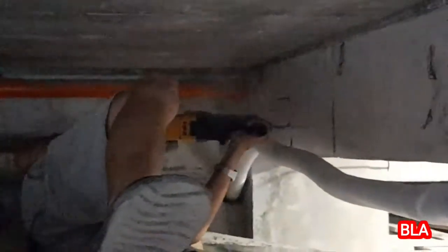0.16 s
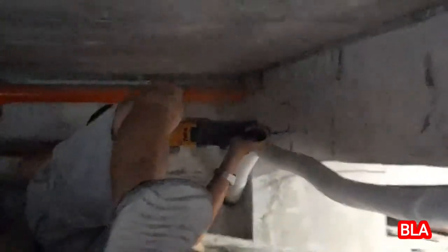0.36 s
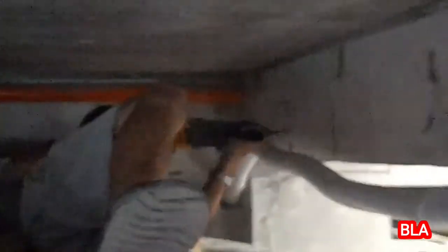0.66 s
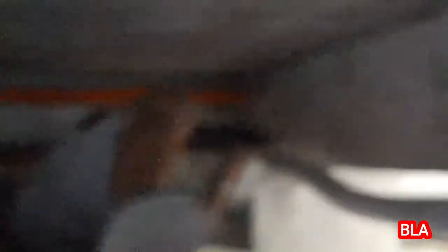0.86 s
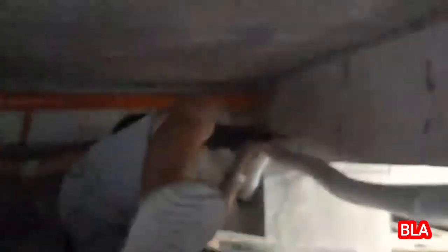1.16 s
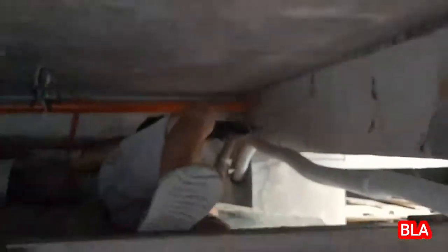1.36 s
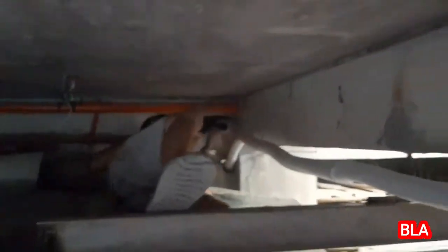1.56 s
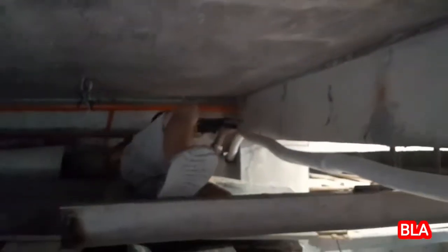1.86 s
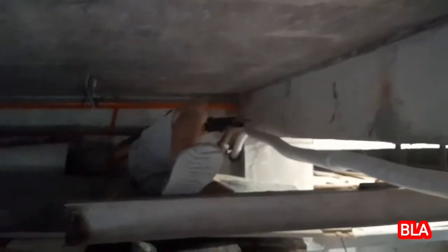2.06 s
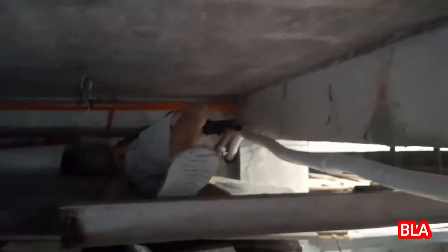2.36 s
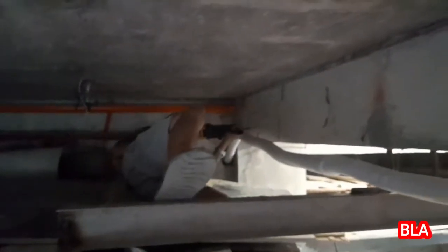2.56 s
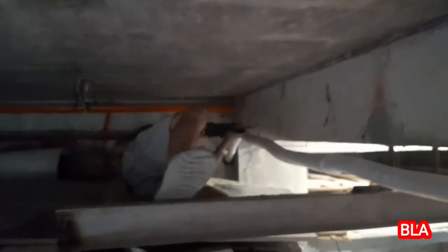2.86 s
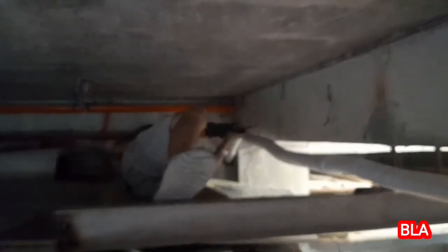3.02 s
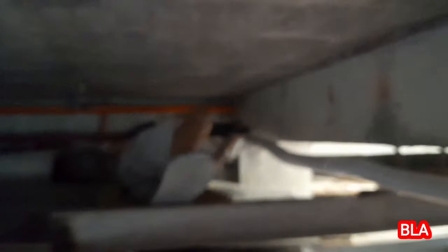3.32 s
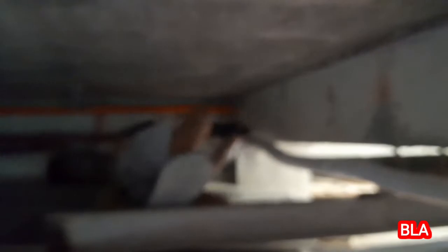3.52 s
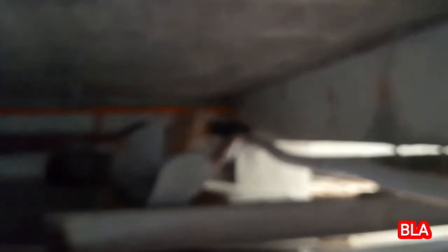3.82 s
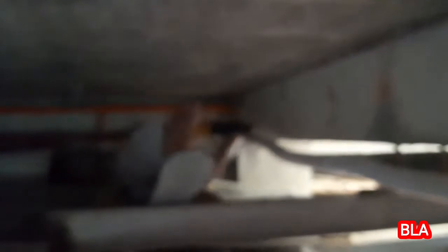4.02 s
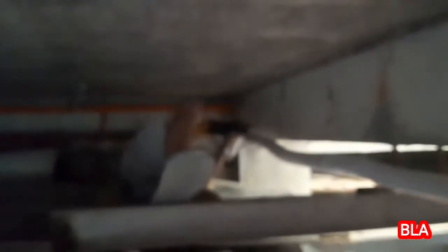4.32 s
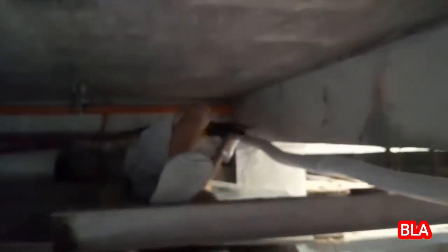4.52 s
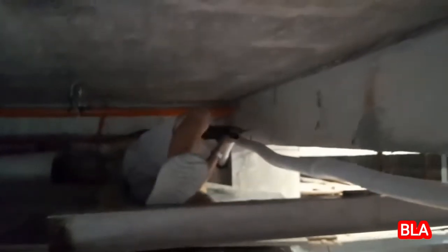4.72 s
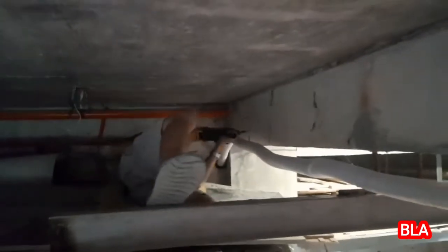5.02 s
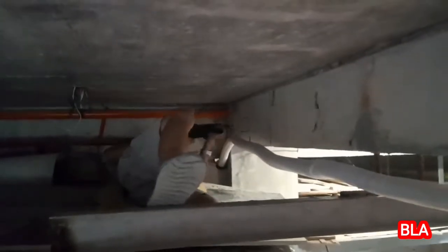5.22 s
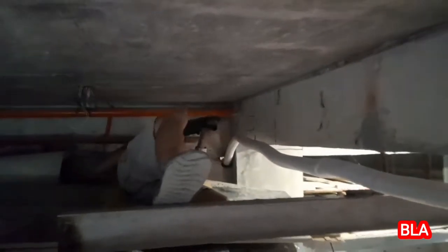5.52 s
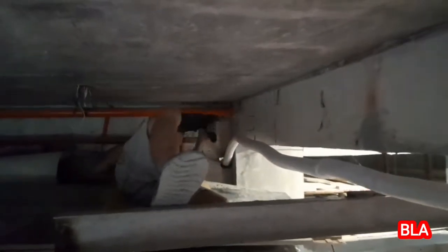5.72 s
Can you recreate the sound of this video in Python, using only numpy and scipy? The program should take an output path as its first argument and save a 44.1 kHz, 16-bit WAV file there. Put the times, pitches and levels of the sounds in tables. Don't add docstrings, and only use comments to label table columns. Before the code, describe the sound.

A phone near a worker in a cramped concrete void picks up three drill blips: a falling whine, a quieter rise and fall, and, after over two seconds of knocks, scuffs and far-off plant drone, a sharp loud rev that sinks in pitch. Gear whine, housing rattle and airy fan are close; thin insect hiss stays far behind, with dense short reverberation.

```python
import sys
import numpy as np
from scipy import signal
from scipy.fft import rfft, irfft
from scipy.io import wavfile
from scipy.ndimage import uniform_filter1d

SR = 44100
rng = np.random.default_rng(int(sys.argv[2]) if len(sys.argv) > 2 else 0)


def store_wav(level_fs):
    pcm = np.round(np.clip(np.atleast_2d(level_fs), -1, 1) * 32767)
    wavfile.write(sys.argv[1], SR, pcm.T.astype(np.int16))


def voltage_ratio(decibels):
    exponent = np.asarray(decibels, float) / 20
    return 10 ** exponent


N = 259291
t = np.arange(N) / SR

TEETH = 7
PATCHY_DB = 2.6
# (frequency [Hz], width [Hz], boost [dB])
SHELL_RINGS = [(342, 51, 6), (500, 86, 2), (628, 98, 9), (807, 76, 6), (960, 23, 2.5), (1200, 80, 3),
               (1663, 360, 6.5), (2060, 100, 5.5), (2516, 94, 0.5), (3950, 370, 1)]


def unit(x):
    return x / np.sqrt(np.mean(x ** 2))


def walk(rate):
    hold = int(SR / rate)
    steps = np.repeat(rng.standard_normal(N // hold + 1), hold)
    return unit(uniform_filter1d(uniform_filter1d(steps, hold), hold)[:N])


def shape(x, points, rings=()):
    hz = np.linspace(1, SR / 2, 2049)
    point_hz, point_db = np.array(points).T
    db = np.interp(np.log(hz), np.log(point_hz), point_db)
    for ring_hz, width_hz, boost_db in rings:
        db = db + boost_db / (1 + (2 * (hz - ring_hz) / width_hz) ** 2)
    cepstrum = irfft(np.log(voltage_ratio(db)))
    cepstrum = np.r_[cepstrum[0], 2 * cepstrum[1:2048], np.zeros(2048)]
    return signal.fftconvolve(x, irfft(np.exp(rfft(cepstrum))))[:len(x)]


def band(x, hz, width_hz, order=2):
    edges = [max(hz - width_hz / 2, 20), hz + width_hz / 2]
    return signal.sosfilt(signal.butter(order, edges, "band", fs=SR, output="sos"), x)


def ports(mid, side, side_db):
    high_pass = signal.butter(2, 1000, "high", fs=SR, output="sos")
    treble = signal.sosfilt(high_pass, side)
    side = voltage_ratio(side_db) * (0.76 * treble + 0.32 * side)
    return np.array([mid + side, mid - side])


def tones(table, flutter, patchy_db):
    out = np.zeros(N)
    waver = 1 + flutter * walk(30)
    patches = voltage_ratio(patchy_db * walk(24.95))
    for start, end, first_hz, last_hz, db in table:
        k = slice(int(start * SR), int(end * SR))
        swell = np.clip(np.minimum(t[k] - start, (end - t[k]) / 2) / 0.027, 0, 1)
        hz = np.interp(t[k], [start, end], [first_hz, last_hz]) * waver[k]
        out[k] += voltage_ratio(db) * patches[k] * swell * np.sin(2 * np.pi * np.cumsum(hz) / SR)
    return out


def gear_whine(phase, hz, tool_db, octaves):
    partials = [0, 4.5, 4, 3.5, 4.5, -2, 0, -8.5, 2]
    # (frequency [Hz], level [dB])
    gearbox = [(300, -16.5), (620, -2), (1000, 1), (1500, 2), (2500, 3), (2900, -3.5), (3400, -4),
               (4000, 2), (4600, -3), (6000, -15.5), (9000, -24)]
    whine = 0
    for k, db in enumerate(partials, 1):
        whine = whine + voltage_ratio(db + PATCHY_DB * walk(40)) * np.sin(2 * np.pi * k * phase)
    driven = uniform_filter1d(1. * (np.gradient(hz) > 0), SR // 20)
    whine_db = tool_db - 2 - 2.5 * abs(octaves + 0.28) - 3.9 * driven
    return shape(voltage_ratio(whine_db) * whine, gearbox, SHELL_RINGS)


def shaft_tones(phase, tool_db, octaves):
    # (multiple of the turn, level minus tool level [dB])
    orders = [(1.54, -23.5), (2, -26), (3, -25.5), (4, -26.5)]
    slow_db = 5.0 * np.minimum(octaves, 0)
    out = 0
    for multiple, db in orders:
        level = voltage_ratio(tool_db + 7.5 + slow_db + db + PATCHY_DB * walk(30))
        out = out + level * np.sin(2 * np.pi * multiple * phase / TEETH)
    return out


def rattle_and_fan(phase, hz, tool_db, octaves):
    # (frequency [Hz], level per Hz [dB])
    housing = [(59, -53), (100, -21.5), (220, -16.5), (275, -10.5), (394, -8.5), (604, -3), (1060, -2.5),
               (1630, -3), (2680, -5.5), (6000, -19), (7800, -25), (13200, -120)]
    # (frequency [Hz], level per Hz [dB])
    air_colour = [(2060, -23), (3500, -9.5), (3850, -7), (5060, -12), (7320, -12), (9030, -10.5),
                  (10200, -7), (14500, -15.5), (15500, -17.5), (16000, -35.5)]
    fan_db = -2.5 + octaves + 0.51 * np.minimum(tool_db + 39.5, 0)
    teeth = np.diff(np.floor(phase), prepend=0) * np.sqrt(SR / hz)
    turn = (1 + 0.22 * np.cos(2 * np.pi * phase / TEETH)) * voltage_ratio(walk(18))
    faces = []
    for strikes, brushes, air in rng.standard_normal((2, 3, N)):
        knocks = teeth * strikes
        rattle = unit(shape((0.62 * knocks + 0.78 * brushes) * turn, housing, SHELL_RINGS))
        fan = unit(shape((0.21 * knocks + air) * turn, air_colour))
        faces.append(voltage_ratio(tool_db - 1.5) * (rattle + voltage_ratio(fan_db) * fan))
    return ports(*faces, side_db=-1.0)


def body_hum(phase, hz, tool_db):
    # (shaft rate [Hz], hum minus tool level [dB])
    boom = [(40, -39.5), (115, -44.5), (145, -30.5), (174, -22.5), (225, -39.5), (278, -18), (315, -19),
            (350, -12)]
    shaft_hz, boom_db = np.array(boom).T
    hum_db = tool_db + np.interp(np.log(hz / TEETH), np.log(shaft_hz), boom_db)
    return voltage_ratio(hum_db + 4.0 + 3.7 * walk(35)) * np.sin(2 * np.pi * phase / TEETH)


def drill():
    # (time [s], tooth rate [Hz], tool level [dB])
    blips = [
        [(0.0, 2512, -21), (0.13, 2198, -24.5), (0.25, 1842, -26), (0.342, 1599, -27.5), (0.5, 1243, -29.5),
         (0.72, 804.3, -32.5), (0.906, 457.3, -37.5), (1.054, 224.4, -45.5), (1.17, 158, -62)],
        [(1.186, 249.2, -54.5), (1.26, 691.3, -34.5), (1.39, 1244, -27.5), (1.5, 1214, -28),
         (1.814, 754.4, -28.5), (2.034, 500, -31.5), (2.304, 221.5, -39.5), (2.41, 144.8, -45.5),
         (2.62, 57.94, -83)],
        [(4.99, 206.1, -65.5), (5.024, 721.5, -51.5), (5.05, 1076, -25), (5.1, 1648, -19), (5.15, 2039, -17.5),
         (5.24, 2035, -20.5), (5.4, 1616, -23), (5.65, 1194, -27.5), (5.88, 828.6, -31)],
    ]
    # (start [s], end [s], first [Hz], last [Hz], level [dB])
    buzz = [
        (1.2, 1.37, 358.7, 359, -48),
        (5.015, 5.085, 368, 364, -37),
    ]
    s, *columns = np.vstack(blips).T
    hz, tool_db = (uniform_filter1d(np.interp(t, s, c), SR // 50) for c in columns)
    octaves = np.log2(hz / 1200)
    on = (t < blips[1][-1][0]) | (t > blips[2][0][0])
    phase = np.cumsum(hz * (1 + .004 * walk(60)) + 3.5 * walk(70)) / SR

    whine = gear_whine(phase, hz, tool_db, octaves) + shaft_tones(phase, tool_db, octaves)
    pan_db = np.array([[.5], [-.5]])
    tool = rattle_and_fan(phase, hz, tool_db, octaves) + voltage_ratio(-8.5 + pan_db) * whine
    low = body_hum(phase, hz, tool_db) * on + tones(buzz, flutter=0.014, patchy_db=-7.0)
    return tool * on, low


def space(x):
    t60_s, echo_db = 0.29, -0.5
    s = t[:SR // 2]
    decay = np.exp(-np.log(1000) * s / t60_s)
    echoes = ports(*rng.standard_normal((2, len(s))) * decay, 0)
    echoes = voltage_ratio(echo_db) * echoes / np.sqrt(np.sum(echoes ** 2) / 2)
    echoes[[0, 1], [4, 0]] += 1
    wet = signal.fftconvolve(x * np.ones((2, 1)), echoes, axes=1)[:, :N]
    return wet / np.sqrt(1 + voltage_ratio(2 * echo_db))


def far_plant():
    # (time [s], level [dB])
    rumble_level = [(0.0, -9), (0.9, -6), (1.06, -3), (1.23, -7), (1.55, 5), (1.93, 1.5), (2.08, 6), (2.5, 5.5),
                    (2.75, 2.5), (3.08, -3.5), (3.3, 2), (3.55, 5.5), (3.86, 1), (3.97, 3), (4.26, 4), (4.5, 2),
                    (5.1, 1.5), (5.88, -0.5)]
    # (frequency [Hz], width [Hz], level [dB], rise per dB of common level [dB])
    low_notes = [
        (52, 5.1, -60.5, 0.7),
        (91.9, 9.3, -65, 1.63),
    ]
    # (frequency [Hz], level per Hz [dB])
    rumble_colour = [(18, -18), (30, -9.5), (108, 0), (300, -15.5), (404, -23.5), (839, -25), (1240, -38),
                     (1700, -41.5), (4970, -49.5), (5830, -54.5), (7000, -44), (9100, -68.5), (15400, -120)]
    rumble_level_db = np.interp(t, *np.transpose(rumble_level))
    layers = []
    for _ in range(2):
        layer = unit(shape(rng.standard_normal(N), rumble_colour)) * voltage_ratio(rumble_level_db - 59.5)
        for hz, width_hz, db, share in low_notes:
            layer += voltage_ratio(db + share * rumble_level_db) * unit(band(rng.standard_normal(N), hz, width_hz))
        layers.append(layer)
    mid, side = layers
    return mid * voltage_ratio([[-.7], [.7]]) + voltage_ratio(-16) * side * np.array([[1], [-1]])


def insects():
    # (frequency [Hz], width [Hz], level [dB])
    chorus = [
        (7780, 900, -72.5),
        (10500, 980, -65.5),
    ]
    out = voltage_ratio(-80) * unit(band(rng.standard_normal((2, N)), 11000, 11000))
    for hz, width_hz, db in chorus:
        singers = unit(band(rng.standard_normal((2, N)), hz, width_hz, order=3))
        out += voltage_ratio(db + 1.2 * walk(6)) * singers
    return out


def outside():
    # (start [s], end [s], first [Hz], last [Hz], level [dB])
    drones = [
        (2.559, 2.949, 523, 497.4, -65.5),
        (2.582, 2.9, 908, 869, -74.5),
        (2.62, 2.9, 1730, 1660, -85.5),
        (3.448, 3.98, 885, 900, -71),
        (4.4, 4.62, 1005, 980, -73.5),
        (4.63, 4.742, 656, 630, -64.5),
        (2.88, 3.18, 502, 493, -80.5),
        (3.68, 3.9, 474, 455, -69.5),
    ]
    return far_plant() + insects() + tones(drones, flutter=0.0073, patchy_db=1.0)


def bumps():
    # (time [s], peak [dB], ring [Hz], treble minus peak [dB])
    knocks = [(2.7487, -70, 1740, -12), (3.184, -41.5, 808, -20), (3.246, -55, 785, -13.5),
              (3.399, -52, 1120, -3), (3.435, -38, 500, -8.5), (3.483, -41.5, 786, -12),
              (3.75, -50.5, 822, -10), (3.988, -46.5, 830, -8), (4.046, -49, 600, -0.5),
              (4.128, -53, 870, 2.5), (4.17, -35.5, 1130, -12), (4.19, -36.5, 795, -24.5),
              (4.441, -53, 406, 0), (4.583, -69.5, 423, 11.5), (4.7265, -57, 1480, -19),
              (4.983, -48, 1580, -14.5)]
    scrape_s = 0.012
    out = np.zeros(N)
    s = t[:SR // 4]
    for at, peak_db, ring_hz, treble_db in knocks:
        noise = rng.standard_normal((3, len(s)))
        ring = 0.5 * unit(band(noise[0], ring_hz, 0.091 * ring_hz))
        ring += 0.81 * unit(band(noise[1], 1.1 * ring_hz, 1150))
        crack = unit(band(noise[2], 7280, 9930)) * voltage_ratio(treble_db + 0.5)
        t60_s = 0.12 * (800 / ring_hz) ** 0.36
        decay = np.exp(-np.log(1000) * np.maximum(s - scrape_s, 0) / t60_s)
        fade = np.minimum(s / 0.0014, 1) * decay
        blow = 1.15 * np.exp(-s / .005) * (np.sin(2 * np.pi * ring_hz * s) + 1.46 * crack)
        i = int(at * SR)
        out[i:i + len(s)] += voltage_ratio(peak_db - 10.5) * ((ring + crack) * fade + blow)
    return out


def rubs():
    # (start [s], hold [s], rub [dB], grit minus rub [dB], weight minus rub [dB])
    shifts = [(2.765, 0.032, -69, -29, 5), (3.195, .04, -68.5, -7, 6.5), (3.414, 0.084, -60.5, -15.5, -5),
              (3.494, .03, -66.5, -9, 8.5), (3.696, 0.045, -67, -10, -1.5), (3.757, .02, -65.5, -7, -2),
              (3.994, 0.033, -50.5, -13.5, 2.5), (4.052, 0.015, -58.5, -4, 5),
              (4.137, 0.029, -66.5, 12, -9), (4.172, 0.012, -51, -12, -4), (4.33, .05, -71.5, -6.5, 0),
              (4.45, .02, -70, 3, 5), (4.508, .04, -65, -5, -1.5), (4.592, .03, -73, -2, -8),
              (4.738, .02, -77, -15, 12.5), (4.99, .02, -59, -23, 11.5)]
    rise_db_s, fall_db_s = 1800, 287
    rub = grit = thud = 0
    for at, hold, db, grit_db, weight_db in shifts:
        rise_db = rise_db_s * np.maximum(at - t, 0)
        fall_db = fall_db_s * np.maximum(t - at - hold, 0)
        press = voltage_ratio(db - rise_db - fall_db)
        rub = rub + press
        grit = grit + press * voltage_ratio(grit_db)
        thud = thud + press * voltage_ratio(weight_db)
    grains = rng.standard_normal((3, N)) * voltage_ratio(3.0 * rng.exponential(size=(3, N)))
    out = unit(band(grains[0], 980, 1800)) * rub * voltage_ratio(-4)
    out += unit(band(grains[1], 6000, 6800)) * grit * voltage_ratio(1.5)
    out += unit(band(grains[2], 227, 193, order=3)) * thud * voltage_ratio(-4.5)
    return out


def worker():
    return bumps() + rubs()


def scene():
    tool, hum = drill()
    near = worker()
    close = voltage_ratio(-7) * near * np.array([[.9], [1]])
    return space(tool + 0.94 * near) + close + hum + outside()


def roll_off(x):
    return signal.sosfilt(signal.butter(12, 16200, fs=SR, output="sos"), x)


def record(dry):
    mix = signal.sosfilt(signal.butter(4, 44, "high", fs=SR, output="sos"), dry)
    return roll_off(mix)


dry = scene()
out = record(dry)
store_wav(out)
```